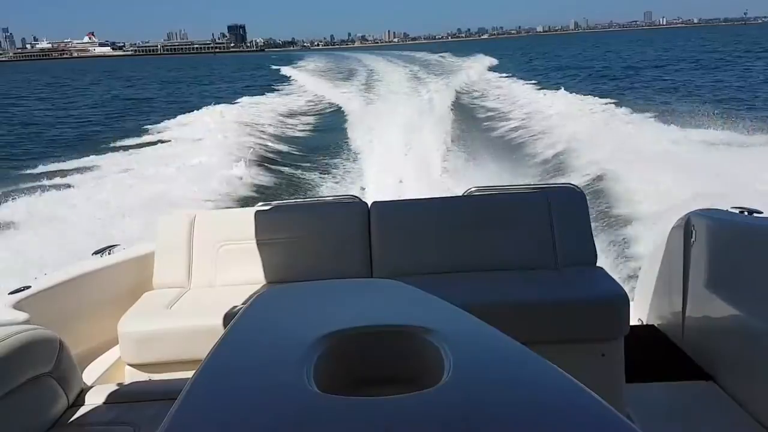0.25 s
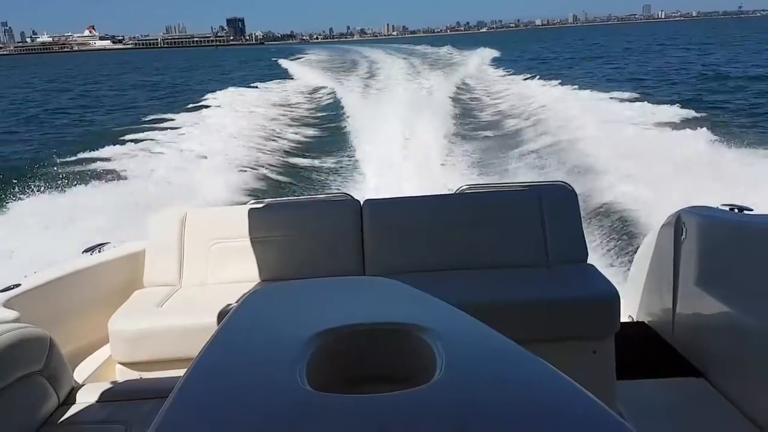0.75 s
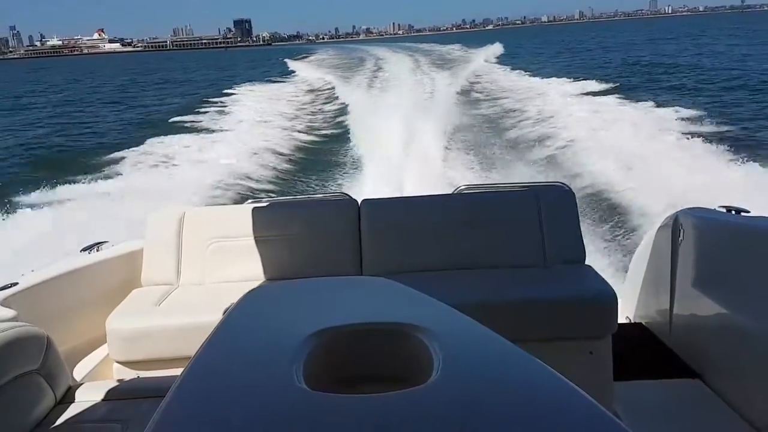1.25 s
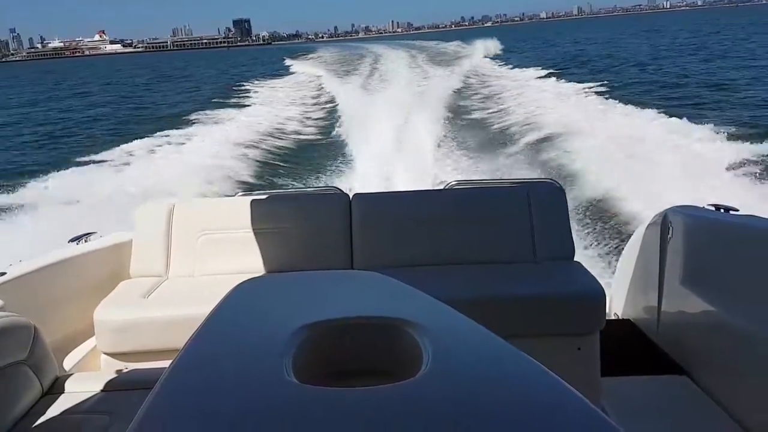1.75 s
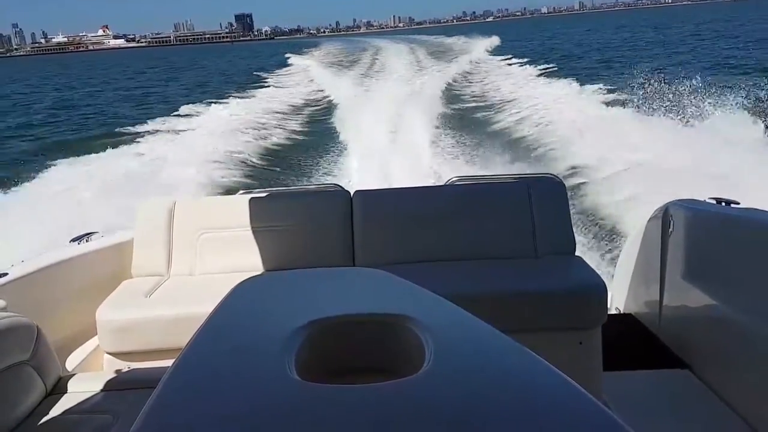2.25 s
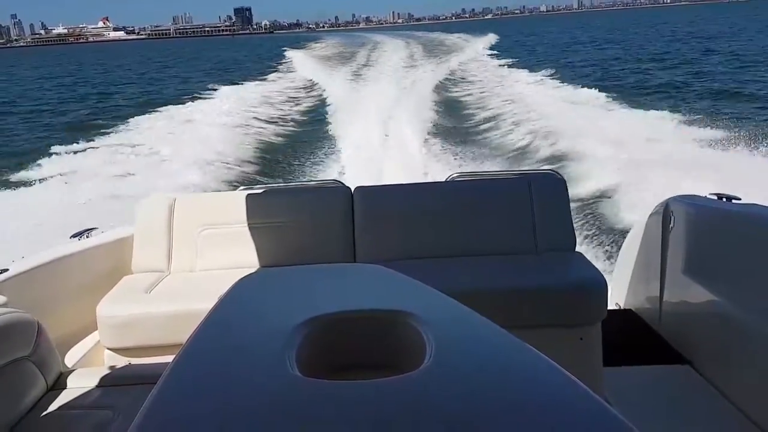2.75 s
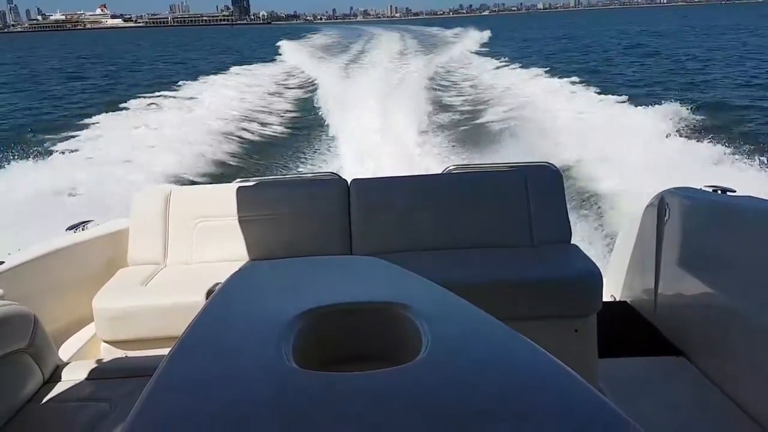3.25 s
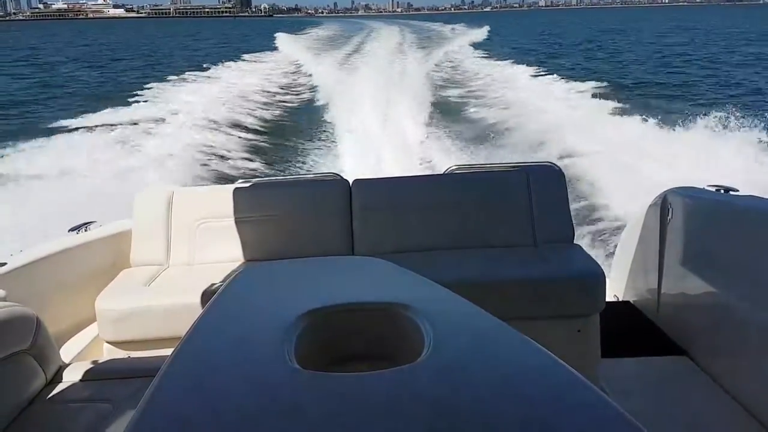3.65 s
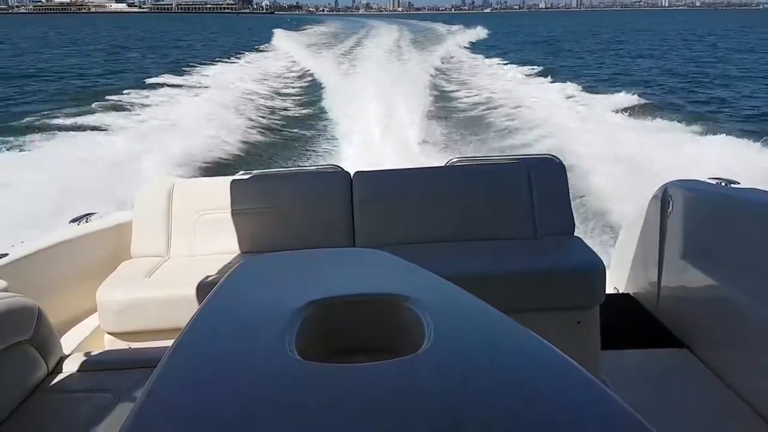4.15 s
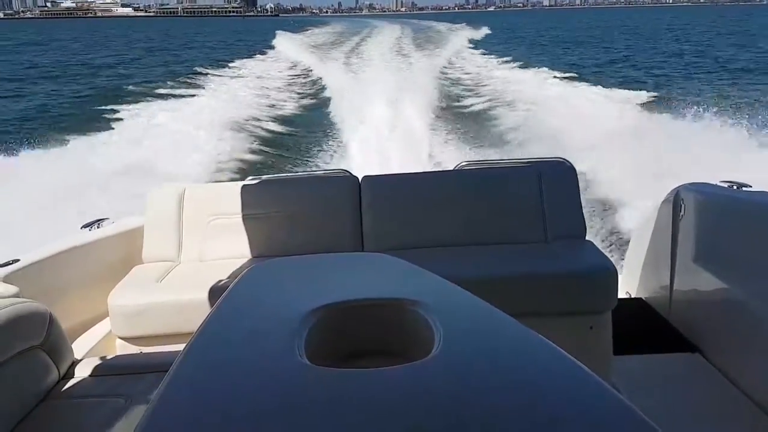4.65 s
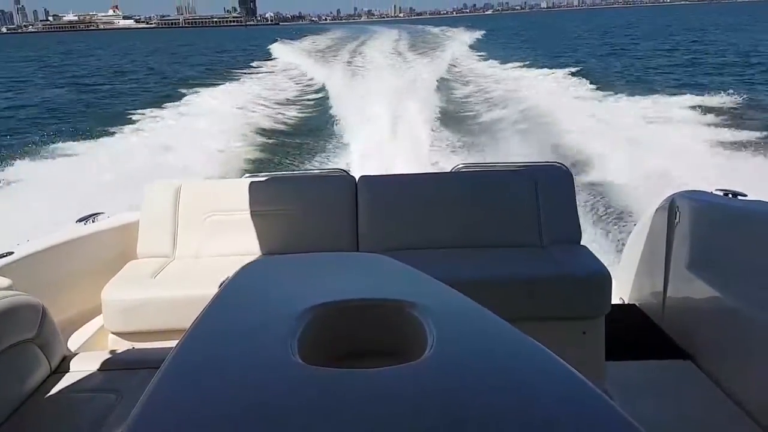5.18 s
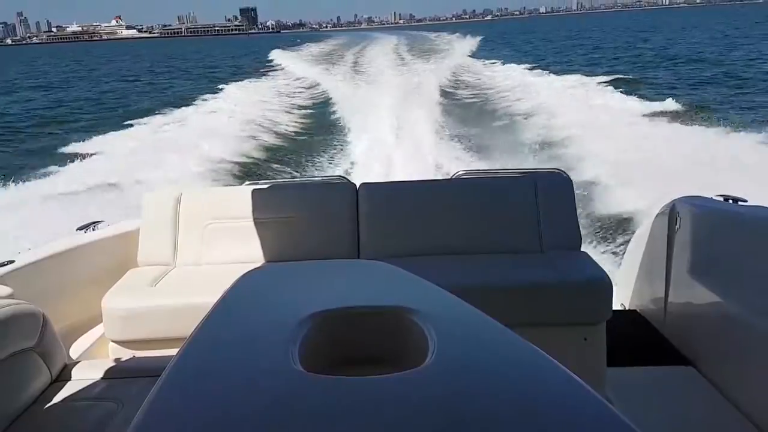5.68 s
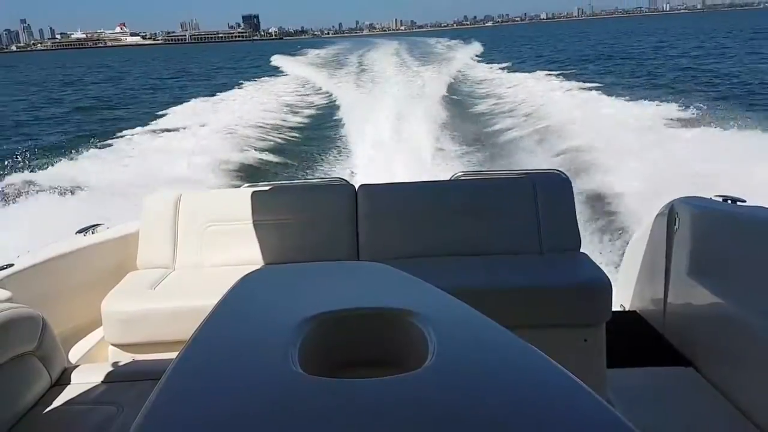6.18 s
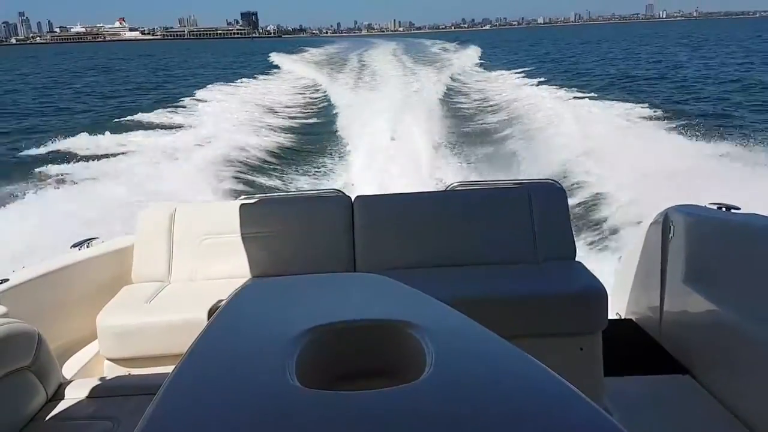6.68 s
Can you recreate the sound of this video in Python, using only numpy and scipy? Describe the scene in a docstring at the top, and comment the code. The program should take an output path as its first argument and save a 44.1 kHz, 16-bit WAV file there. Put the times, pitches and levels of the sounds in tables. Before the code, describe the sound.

From the open cockpit of a speeding motorboat, two large engines run continuously at nearly equal speed. A strong, nasal whine around one kilohertz dominates, shimmering and beating. Beneath it are dense engine and propeller hum, broad hull rumble and a coarse mid-range roar; spray hiss is much fainter on top. Small waves briefly shift the levels, most clearly near the end. Close, wide stereo, outdoors without echo.

```python
"""In an open-water cockpit, a fast boat planes on two eight-cylinder engines at slightly different speeds.
Gear whine, crank, belt and propeller tones are sums of sines locked to each engine's rotation, so pairs beat.
Hull rumble, engine roar and spray hiss are coloured stereo noise; waves change their levels and the whine's.
Two faint breathy whistles, narrow bands of noise, lie at the top."""
import sys
import numpy as np
from scipy import signal
from scipy.fft import rfft, irfft, next_fast_len
from scipy.io import wavfile

SR = 44100
rng = np.random.default_rng(int(sys.argv[2]) if len(sys.argv) > 2 else 0)


def pcm_store(signal):
    """Save signal as 16-bit PCM."""
    levels = np.round(np.clip(np.atleast_2d(signal), -1, 1) * 32767)
    wavfile.write(sys.argv[1], SR, levels.astype(np.int16).T)


def undo_db(level):
    """Turn decibels back into plain size, where 20 dB means ten times bigger."""
    steps = np.asarray(level, float) / 20
    return 10 ** steps


N = 305172   # length [samples]
HOLD = 40   # samples per step of a slow control

# the microphone pair: (frequency [Hz], left-right likeness [0-1], left lag [rad])
MICROPHONE_PAIR = [(20, .93, .25), (90, .95, .25), (250, .96, .3), (480, .7, .25), (650, .82, .6),
                   (850, .75, 1.4), (1030, .3, 1.6), (1500, .4, 3.1), (2000, .5, 3.4), (3000, .3, 3.5),
                   (5500, .1, 3.7), (16000, .03, 6.3)]
# extra delay to the left ear from where the engines sit: (first [ms], second [ms])
CRANK_LAG_MS = (-0.133, 0.129)


def in_time(rows):
    """Linear interpolation: the columns of a time table, one value per sample."""
    s, *columns = np.transpose(rows)
    return [np.interp(np.arange(N) / SR, s, c) for c in columns]


def at_hz(rows, hz):
    """Logarithmic frequency scale: the columns of a frequency table, linear between points in log Hz."""
    f, *columns = np.transpose(rows)
    log_hz = np.log(np.maximum(hz, 1))
    return np.array([np.interp(log_hz, np.log(f), c) for c in columns])


def rms_one(x):
    """Power normalization: scale to rms 1."""
    return x / np.sqrt(np.mean(x ** 2) + 1e-20)


def drift(rate):
    """Low-passed noise: slow chance of spread 1, one value per step, changing about rate times a second."""
    pole = np.exp(-2 * HOLD * np.pi * rate / SR)
    settle = 2000   # steps dropped while the filter settles
    noise = rng.standard_normal(N // HOLD + 2 + settle)
    slow = signal.lfilter([1], [1, -2 * pole, pole * pole], noise)[settle:]
    return rms_one(slow - slow.mean())


def each_sample(slow):
    """Sample and hold: spread one value per step over all samples."""
    return np.repeat(slow, HOLD, axis=-1)[..., :N]


def gain_line(slow_db):
    """Amplitude modulation: gain for every sample from slow dB."""
    return np.float32(each_sample(undo_db(slow_db)))


def stereo_noise(colour, shared_db, own_db, flicker_hz, resonances=()):
    """Partial coherence: noise at a microphone pair, in bands that swell together and flicker apart; rms 1."""
    bands_per_octave = 1.4
    size = next_fast_len(N, real=True)
    hz = np.fft.rfftfreq(size, 1 / SR)
    alike, lag = at_hz(MICROPHONE_PAIR, hz)
    alike = np.clip(alike, 0, 1)
    common, other = rfft(rng.standard_normal((2, size)))
    left = (alike * common + np.sqrt(1 - alike ** 2) * other) * np.exp(-1j * lag)
    pair = np.array([left, common]) * undo_db(at_hz(colour, hz))
    for centre_hz, width_hz, lift_db in resonances:
        pair = pair * undo_db(lift_db / (1 + (2 * (hz - centre_hz) / width_hz) ** 2))

    together_db = shared_db * drift(flicker_hz / 2)
    place = bands_per_octave * np.log2(np.maximum(hz, 1))
    lowest_hz, highest_hz = colour[0][0], 2 * colour[-1][0]
    out = 0
    for band in range(*np.int_(bands_per_octave * np.log2([lowest_hz, highest_hz]))):
        share = np.clip(1 - abs(place - band), 0, 1)     # overlapping bands that sum to one
        piece = irfft(np.complex64(pair * share), size)[:, :N]
        out = out + gain_line(together_db + own_db * drift(flicker_hz)) * piece
    return rms_one(out)


def tones(rows, turns, lags_ms, waver_db, swells_db={}):
    """Harmonic synthesis: sines on multiples of rotation, wavering or following swells, lagged at the left."""
    inaudible_db = -52   # weaker tones are left out
    out = np.zeros((2, N), np.float32)
    for order, *level_db in rows:
        start = rng.random()      # in cycles; like engines share the shape of a cycle
        for k, turn in enumerate(turns):
            left_db, right_db = level_db[2 * k:2 * k + 2]
            if max(left_db, right_db) < inaudible_db:
                continue
            mean_hz = order * (turn[-1] - turn[0]) * SR / N
            lag = at_hz(MICROPHONE_PAIR, mean_hz)[1] + 2 * np.pi * mean_hz * lags_ms[k] / 1000
            slow_db = swells_db[order][k][::HOLD] if order in swells_db else waver_db * drift(2.5)
            gain = gain_line(slow_db)
            cycles = order * turn + start
            phase = np.float32(2 * np.pi * (cycles - np.floor(cycles)))
            out[0] += np.float32(undo_db(left_db)) * gain * np.cos(phase - np.float32(lag))
            out[1] += np.float32(undo_db(right_db)) * gain * np.cos(phase)
    return out


def waves():
    """Transient loading: where the hull meets a wave, levels shift along an uneven bell, in dB per sample."""
    # (time [s], wash lift [dB], whine lift [dB], its third overtone lift [dB], fourth overtone lift [dB])
    hull_waves = [(0.03, -0.7, 1.4, 1, 0), (.45, -1.7, 0.4, -13, 1.5), (2.05, 1.5, -1.3, -4, -3),
                  (2.7, -0.1, .3, 6, 2), (3.3, -0.7, .3, 9, -2), (3.85, 0.5, 0.3, 7, 1),
                  (4.6, 1, -3, 12, 7.5), (5.9, 1.3, 0, 4, 2), (6.63, 2.5, 0, 10.5, -0.5),
                  (6.85, 3, 1, 10, 1.5)]
    rise_s, fall_s = 0.055, 0.12
    s, *lifts_db = np.transpose(hull_waves)
    late = np.arange(0, N, HOLD) / SR - s[:, None]
    shape = np.exp(-(late / np.where(late < 0, rise_s, fall_s)) ** 2)
    return each_sample(np.array(lifts_db) @ shape)


def gear_whine(rpm, cycles, whine_db, third_db, fourth_db):
    """Gear meshing: 32 per engine cycle with overtones; the first is on a resonance flank, so follows speed."""
    # one row per overtone from the first, before swells:
    # (first engine left [peak dB], right [peak dB], second engine left [peak dB], right [peak dB])
    whine_levels = [(-13.7, -9.5, -11.7, -11.2), (-55, -44, -42, -46), (-45, -42, -52, -48),
                    (-47.5, -55, -53, -38.5)]
    set_rpm, db_per_rpm = (3780, 3766), (0.094, -0.275)   # first, second engine
    third_rest_db, fourth_rest_db, waver_db = -1, -1.5, 2   # overtones between waves
    first_db = [whine_db + slope * (speed - rest) for speed, rest, slope in zip(rpm, set_rpm, db_per_rpm)]
    wavers_db = [waver_db * each_sample(drift(5.0)) for _ in range(4)]
    swells_db = {32: first_db,
                 96: third_rest_db + third_db + wavers_db[:2],
                 128: fourth_rest_db + fourth_db + wavers_db[2:]}
    rows = [(32 * (k + 1), *db) for k, db in enumerate(whine_levels)]
    return tones(rows, cycles, CRANK_LAG_MS, waver_db=6.5, swells_db=swells_db)


def crank_and_belts(cycles):
    """Periodic forcing: whole orders from the crank and firing, broken orders from belt-driven accessories."""
    # before waver: (order [per engine cycle of two turns, 8 = firing],
    # first engine left [peak dB], right [peak dB], second engine left [peak dB], right [peak dB])
    crank = [(2, -37, -45, -68, -49), (3, -37, -41, -36.5, -55), (6, -50, -50, -44, -58),
             (8, -36, -42.5, -34, -30.5), (12, -46, -53, -51, -45), (13, -54, -55, -46.5, -49),
             (14, -52, -59, -63, -52), (15, -37, -35.5, -67, -40), (16, -34.5, -28, -63, -73),
             (17, -57, -44, -49, -44), (18, -37, -46, -55, -40), (19, -33, -33.5, -46, -46.5),
             (20, -36, -49, -47, -46), (21, -49, -46, -37, -52), (22, -48, -33, -47.5, -48),
             (23, -37, -39, -37.5, -67), (24, -45, -41, -57, -37.5), (26, -41, -58, -43, -40),
             (28, -61, -64, -31.5, -42), (30, -41, -30, -31.5, -32), (34, -34, -50, -51, -58),
             (36, -62, -62, -35, -38), (40, -47, -34.5, -37.5, -51), (41, -44, -44.5, -55, -59),
             (44, -58, -55, -52, -53), (47, -48, -60, -37, -47), (48, -45, -42, -36.5, -39),
             (50, -47, -56, -36.5, -43)]
    # belt orders [per engine cycle]
    belt_orders = [26.947, 30.316, 33.684, 49.5, 65.685, 71.618]
    # before waver: (first engine left [peak dB], right [peak dB], second left [peak dB], right [peak dB])
    belt_levels = [(-62, -66, -29.5, -28.5), (-60, -57, -40, -42), (-60, -60, -46, -30.5),
                   (-39.5, -55, -60, -62), (-67, -57, -59, -51), (-53, -38, -70, -70)]
    belts = [(order, *db) for order, db in zip(belt_orders, belt_levels)]
    return tones([*crank, *belts], cycles, CRANK_LAG_MS, waver_db=2.0)


def propellers(cycles):
    """Blade-passing tones: sines on orders of each propeller shaft, geared to its engine."""
    # before waver: (order [per propeller turn, 3 = blades, 26 = lower gear],
    # first left [peak dB], right [peak dB], second left [peak dB], right [peak dB])
    propeller = [(1, -43.5, -46, -60, -63), (3, -30.5, -32, -33.5, -34.5), (4, -30, -35, -46, -47),
                 (5, -40, -51, -48, -50), (6, -43, -29, -55, -60), (7, -30.5, -37, -52, -50.5),
                 (8, -50.5, -38.5, -34.5, -37), (10, -45, -44, -37.5, -37), (23, -56, -56, -37, -39),
                 (24, -58, -62, -45, -34.5), (25, -45, -45, -38, -41), (26, -31, -29, -24.5, -25),
                 (29, -29.5, -24, -70, -65), (52, -54, -36, -40.5, -44.5)]
    turns_per_cycle, second_lead = 1.1012, 0.41   # second shaft's start angle ahead [turns]
    lag_ms = (0.21, -0.04)   # extra delay to the left ear, first and second
    first, second = cycles
    shafts = turns_per_cycle * first, turns_per_cycle * second + second_lead
    return tones(propeller, shafts, lag_ms, waver_db=2.4)


def engines(whine_db, third_db, fourth_db):
    """Phase locking: integrated speed gives the rotation that all tones of an engine share."""
    # the engines hunt about their set speeds: (time [s], first engine [rpm], second engine [rpm])
    speeds = [(0.0, 3766.4, 3767.1), (0.44, 3777.6, 3762.2), (0.83, 3784.4, 3763.9), (1.07, 3782.2, 3766.0),
              (1.74, 3781.9, 3761.9), (1.86, 3789.5, 3758.9), (1.98, 3786.7, 3764.7),
              (3.24, 3781.4, 3765.1), (3.36, 3792.2, 3768.4), (3.48, 3781.0, 3771.2), (4.2, 3768.7, 3756.5),
              (4.45, 3777.5, 3762.1), (4.57, 3772.9, 3771.9), (5.23, 3780.3, 3761.9),
              (5.84, 3784.4, 3774.4), (6.25, 3780.5, 3764.8), (6.71, 3796.2, 3784.5),
              (6.92, 3780.9, 3769.7)]
    second_lead = 0.2475   # second crank's start angle ahead of the first [cycles]
    rpm = in_time(speeds)
    first, second = np.cumsum(rpm, axis=1) / 120 / SR   # a cycle is two turns
    cranks = first, second + second_lead
    return (gear_whine(rpm, cranks, whine_db, third_db, fourth_db)
            + crank_and_belts(cranks)
            + propellers((first, second)))


def rumble(wash_db):
    """Broadband low-frequency noise: the hull's rumble, shifted in full by the waves."""
    # (frequency [Hz], left [relative dB per Hz], right [relative dB per Hz])
    rumble_colour = [(20, -25, -21), (32, -17, -15), (45, -6.5, -3.5), (80, -4, -4.5), (120, 0, 1),
                     (230, -1.5, -2.5), (326, -4.5, -5.5), (440, -9, -4), (650, -17, -13), (1010, -32, -18)]
    noise = stereo_noise(rumble_colour, shared_db=1.6, own_db=0.6, flicker_hz=4.0)
    return undo_db(-24 + wash_db) * noise   # dB rms between waves


def roar(wash_db):
    """Resonant filtering: mid-frequency engine noise, lifted where the engine bay resonates."""
    # (frequency [Hz], left [relative dB per Hz], right [relative dB per Hz])
    roar_colour = [(402, -18, -27), (627, -6, -6.5), (785, -12, -8.5), (840, 1.5, 3), (980, -5, -2),
                   (990, -9, 5.5), (1058, -7, -2), (1190, -7.5, -6.5), (1855, -4.5, -4), (2120, -8.5, -8),
                   (2990, -12.5, -11.5), (3210, -21, -16.5), (3650, -18.5, -16), (5080, -32, -26.5),
                   (7040, -38.5, -36)]
    # engine bay resonances: (frequency [Hz], width [Hz], lift [dB])
    bay = [(1113, 16, 3.5), (1373, 20, 3.5), (1738, 30, 3.5), (1936, 40, 4.5), (2040, 41, 3.5),
           (2500, 32, 3.5), (2870, 76, 1.5), (3280, 59, 4), (3910, 18, 10)]
    wave_share = 0.99   # of the wash lift
    noise = stereo_noise(roar_colour, shared_db=0.82, own_db=0.84, flicker_hz=5.3, resonances=bay)
    return undo_db(-22 + wave_share * wash_db) * noise   # dB rms between waves


def spray(wash_db):
    """Broadband high-frequency noise: spray hiss with fast flicker, shifted in full by the waves."""
    # (frequency [Hz], left [relative dB per Hz], right [relative dB per Hz])
    spray_colour = [(2500, -5, -21), (4700, 6, 4.5), (6840, -9, 3), (7930, 4, 6.5), (8970, -1, -3),
                    (10500, 4, -6), (12000, -0.5, -3), (13000, 4, -1.5), (14200, -4, 1), (15700, 0, -3),
                    (19000, -21, -5)]
    noise = stereo_noise(spray_colour, shared_db=0.5, own_db=0.76, flicker_hz=22)
    return undo_db(-41 + wash_db) * noise   # dB rms between waves


def whistles():
    """Band-pass filtering: noise through two narrow bands makes faint breathy pitches."""
    # (frequency [Hz], width [Hz], level [dB rms])
    whistle_bands = [(14650, 260, -57.5), (15060, 260, -58)]
    out = np.zeros((2, N))
    for hz, width_hz, level_db in whistle_bands:
        band = signal.butter(2, [hz - width_hz / 2, hz + width_hz / 2], "band", fs=SR, output="sos")
        out += undo_db(level_db) * rms_one(signal.sosfilt(band, rng.standard_normal((2, N))))
    return out


def scene():
    """Superposition: engine tones, rumble, roar, spray and whistles add; the waves move all but some tones
    and the whistles."""
    wash_db, *whine_lifts_db = waves()
    return engines(*whine_lifts_db) + rumble(wash_db) + roar(wash_db) + spray(wash_db) + whistles()


def top_cut(x):
    """Nothing passes above the cut-off."""
    return signal.sosfilt(signal.butter(12, 15740, fs=SR, output="sos"), x)


def record(dry):
    """Soft saturation: the input stage rounds the highest peaks."""
    top, sharpness = 1.0, 5   # height that peaks approach, sharpness of the knee
    rounded = dry / (1 + abs(dry / top) ** sharpness) ** (1 / sharpness)
    return top_cut(rounded)


dry = scene()
out = record(dry)
pcm_store(out)
```